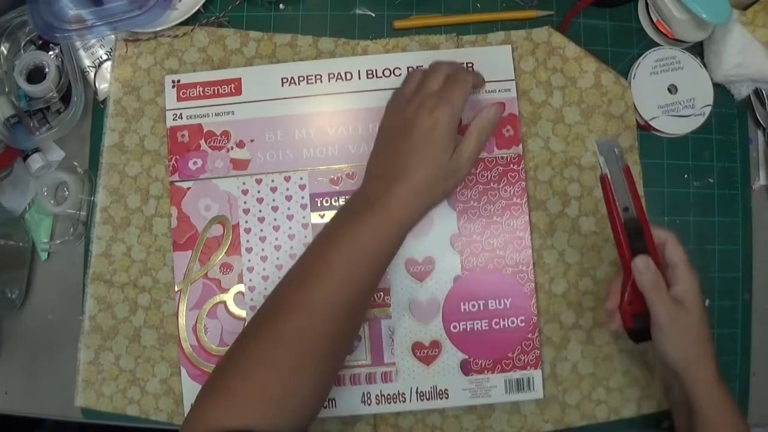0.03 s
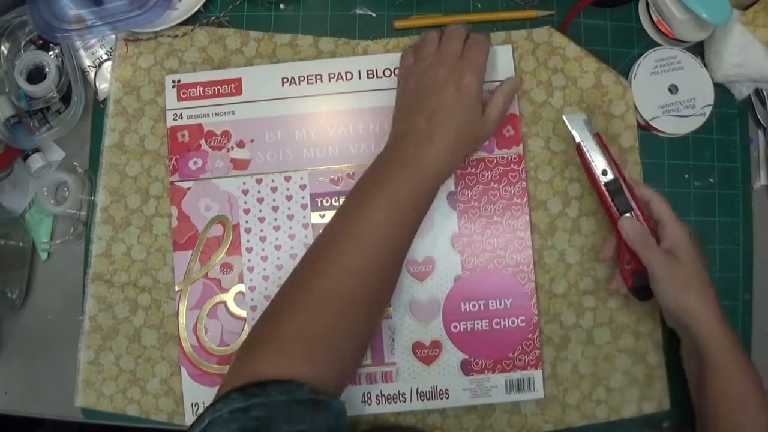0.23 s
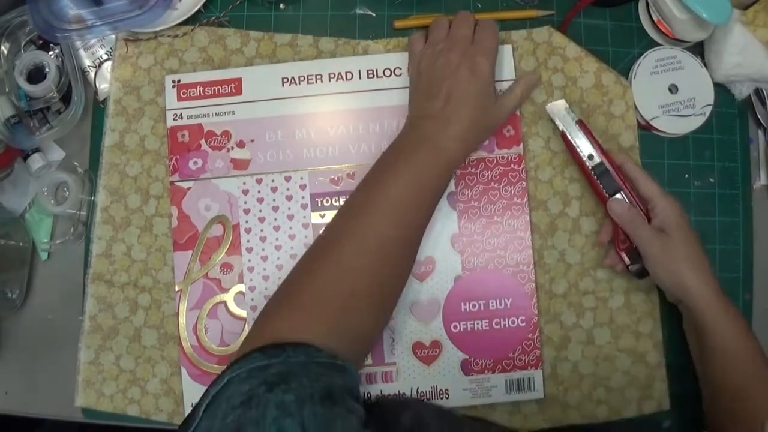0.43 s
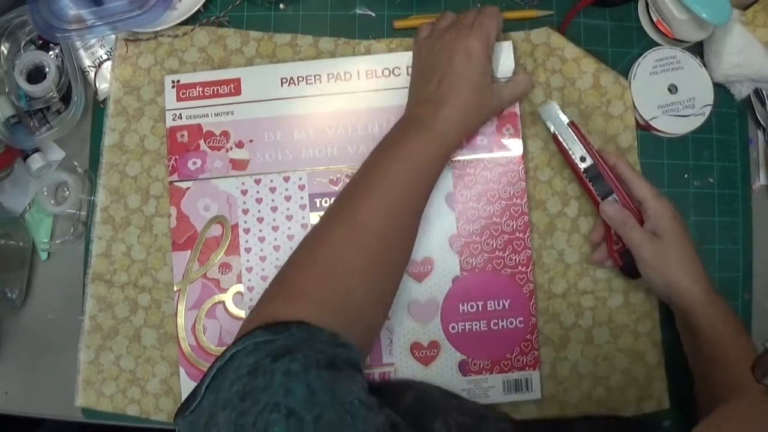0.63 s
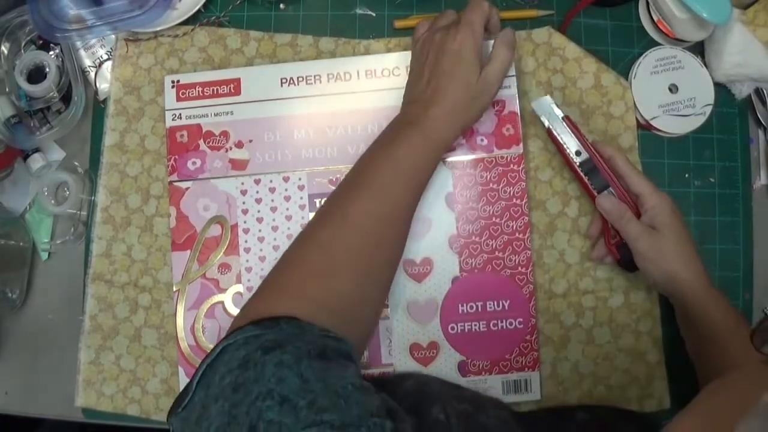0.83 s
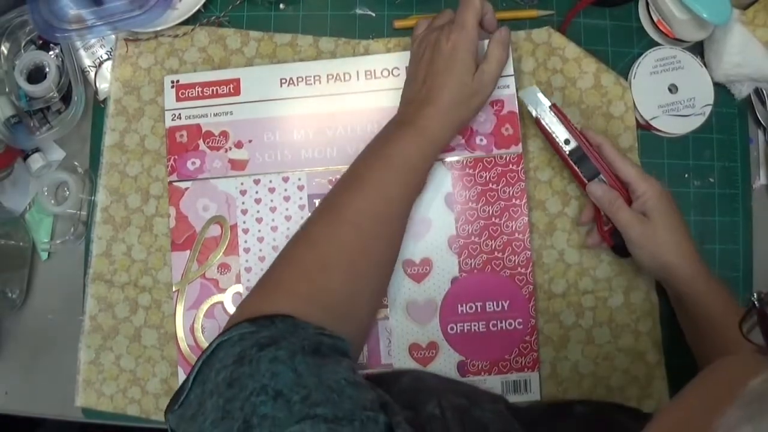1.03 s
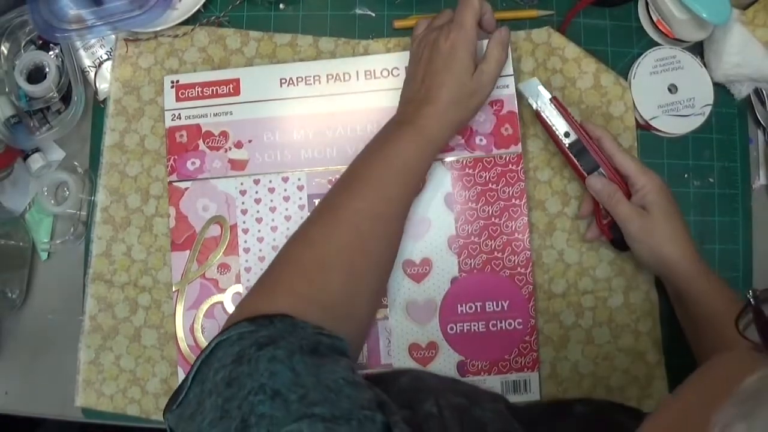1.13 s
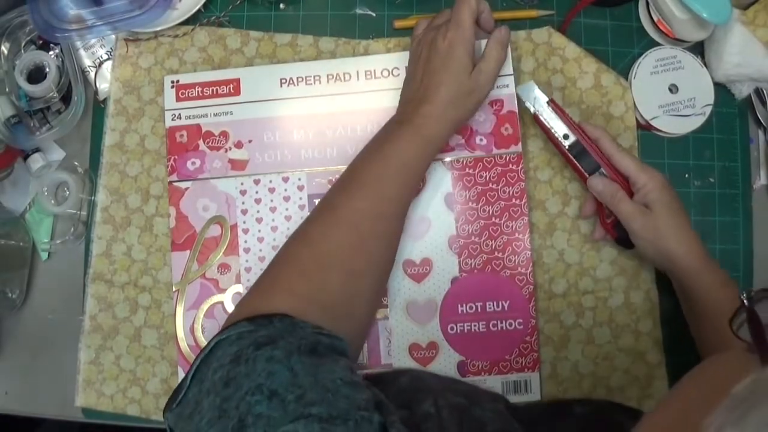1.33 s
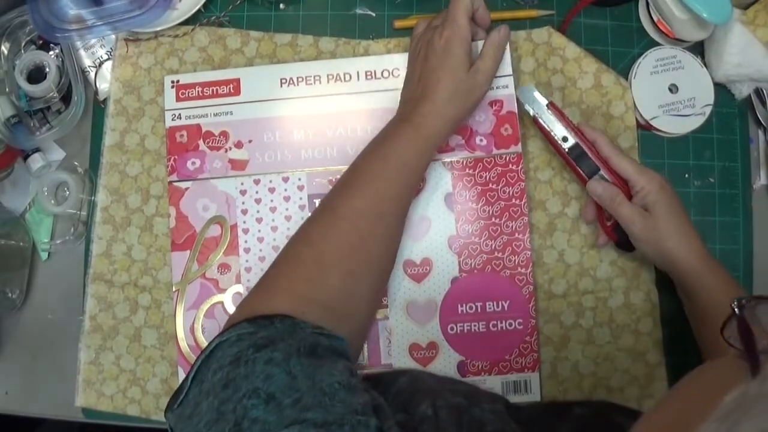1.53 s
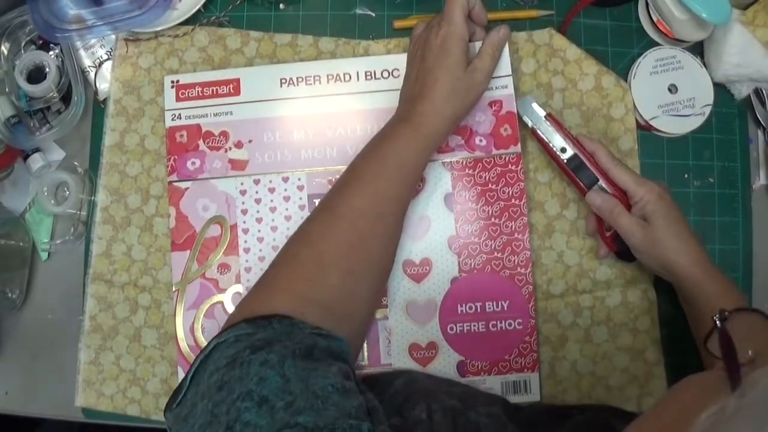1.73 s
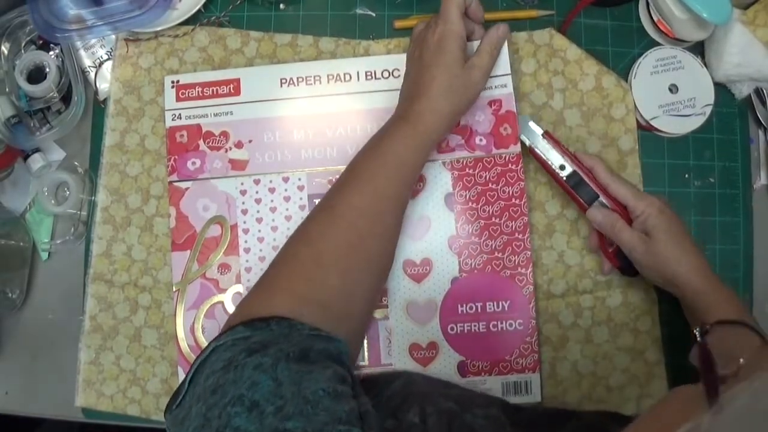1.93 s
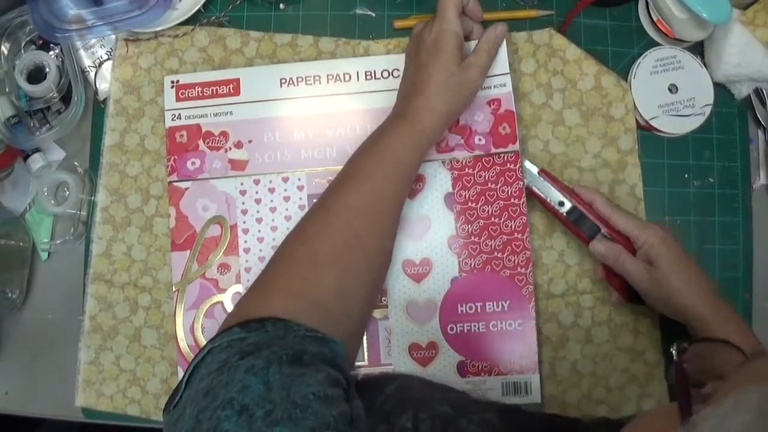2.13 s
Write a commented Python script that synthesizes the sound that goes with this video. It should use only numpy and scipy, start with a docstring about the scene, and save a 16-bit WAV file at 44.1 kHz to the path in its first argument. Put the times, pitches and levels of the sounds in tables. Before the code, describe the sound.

A knife blade ticks and snaps taut plastic wrap on a paper pad. Light clicks come at 0.1 seconds, a brief slide and dull hand thud with table boom around 0.35, then scattered ticks from 0.55 to 1.35. A sharp snap lands at 1.64, with harder crackling snaps and knocks at 1.9-2.1, ending in a short scrape. Close, small room, steady low rumble, faint hiss.

```python
"""Sharp snaps and tiny tears of taut plastic film, dull thuds on a table, faint sliding and a low steady rumble.
A snap-off utility knife slits the wrap of a thick paper pad on a craft table in a small room.
Snaps, knocks and thuds are short bursts of uneven noise with their own colour; film, pad and table ring.
Fingers and blade slide over the film as filtered grain noise, and the pressed blade makes it sing faintly.
A table reflection and room echoes carry the work to two microphones, over a rumble with a little hiss."""
import sys
import numpy as np
from scipy import signal
from scipy.fft import rfft, irfft, next_fast_len
from scipy.io import wavfile
from scipy.ndimage import uniform_filter1d

SR = 44100
rng = np.random.default_rng(int(sys.argv[2]) if len(sys.argv) > 2 else 0)


def pcm_store(signal):
    """Save signal as 16-bit PCM."""
    levels = np.round(np.clip(np.atleast_2d(signal), -1, 1) * 32767)
    wavfile.write(sys.argv[1], SR, levels.astype(np.int16).T)


N = 96270  # samples in the scene
CONTACT_SIZE = 8192  # samples in one contact

# Centre frequencies in Hz of the five colour bands of a snap.
SNAP_BANDS_HZ = [400, 650, 1400, 3600, 8000]
# The blade ticks on the film and tears it. Each row: start in seconds, length in seconds, level in dB in each
# of the five bands, then two rings of the taut film: low ring in Hz, its dB, high ring in Hz, its dB.
FILM_SNAPS = [ (0.0989, 0.0079, -33, -24, -3, 3.5, 2, 2055, 19.6, 3680, 4.3),
              (0.1654, 0.0014, 2.5, 0.5, -7.5, -10, -5.5, 560, 4.6, 7300, 2.8),
              (0.552, 0.0042, -18, -6.5, -23, -9.5, -11, 4200, 4.9, 6940, 3),
              (0.7308, 0.0051, -31, -3.5, -10.5, -15, -21, 950, 9.9, 1100, 9.5),
              (0.769, 0.0064, -9, -5, -4, -8, -7, 830, 4.3, 1120, 4.6),
              (0.7758, 0.013, 3.5, 6.5, 1, 2.5, 10, 2075, 9.4, 8300, 2.5),
              (1.0518, .005, -13, -14, -9, 9.5, 5, 1830, 15.8, 2336, 18.2),
              (1.1046, 0.012, -17, -16, -13.5, -1, 2.5, 1900, 18.4, 3125, 19),
              (1.2039, 0.0014, -15, -6, 0, 17, -22, 3090, 9.8, 3820, 14),
              (1.2045, 0.0034, 1, 2.5, 5.5, 9, 18, 3170, 7.7, 3790, 7),
              (1.341, 0.011, -31, -12, -10, -10, -13, 3000, 2, 3540, 13),
              (1.5210, 0.00075, -17, -31, -15, -18, -15, 4170, 5.9, 8200, 2.8),
              (1.6368, 0.0034, 2.5, 17, 20, 18.5, 16, 2733, 6.7, 7160, 4.8),
              (1.6420, 0.006, -7.5, 6, 7.5, 10, 6.5, 1140, 4, 2860, 3.4),
              (1.9039, 0.0029, 0.5, -8.5, -6, -7, -3.5, 1570, 3.5, 4730, 7.3),
              (1.936, 0.0059, -6, -5, -8, -4, -6, 1500, 2.7, 4500, 3),
              (1.946, 0.0066, 8, 11, 14.5, 10.5, 11, 1480, 8.1, 4530, 4.9),
              (1.9749, 0.003, -17, 19.5, 14.5, 11.5, 13.5, 1280, 2.4, 4430, 8.6),
              (2.055, 0.0018, -12, 0, -19, -13, -10, 4430, 2, 6800, 6.6),
              (2.0928, 0.0097, 14.5, 9, 10, 6.5, 3.5, 1660, 4.9, 3120, 2),
              (2.1020, 0.0034, 4, 24.5, 11, 13.5, 5.5, 1300, 15.6, 3080, 8.9),
              (2.112, .0006, -2, -8, 9, -11, 7, 9050, 9.2, 12800, 16),
              (2.116, 0.002, 16, 9, 0, 7, -4, 1260, 3.5, 1620, 3.8)]
# Time constants of a snap, and how unevenly its slips, and those of every other contact, are sized.
SNAP_ATTACK_S, SNAP_RELEASE_S, TEAR_SPREAD_DB = 0.00066, 0.0015, 2.5

# Resonances and hollows of knife and wrapped pad. Each row: centre in Hz, width in Hz, height in dB.
BODY_RESONANCES = [(609, 74, 5.5), (1230, 53, 3.5), (1606, 130, 4), (2187, 294, -3), (2784, 75, 7),
                   (3154, 40, 2), (3515, 220, 1), (3715, 180, 2), (4300, 125, 4), (4530, 130, 3),
                   (5114, 99, 4), (5640, 220, -6), (7030, 69, 2.5), (7740, 130, 3.5), (8530, 330, -1),
                   (9640, 640, -2)]
# Dulling of the top end. Each row: frequency in Hz, gain in dB.
TREBLE_LOSS = [(8000, -2), (10000, -7), (12000, -16.5), (15500, -28)]

# Hard knocks on the pad. Each row: start in seconds, level in dB, treble lift or cut in dB.
PAD_KNOCKS = [(1.9814, 4.5, -3), (1.9836, -9.5, 3), (2.1048, -2, -4.5)]
# Colour of a knock. Each row: frequency in Hz, level in dB.
KNOCK_COLOUR = [(90, -9), (170, -2), (300, 10.5), (420, 24), (640, 25.5), (900, 20), (1350, 22.5),
                (2000, 11.5), (3500, 18.5), (8000, 12)]
KNOCK_LENGTH_S, KNOCK_RELEASE_S = 0.0012, 0.0013
KNOCK_BRIGHT_HZ = 3000  # half of the treble lift or cut is reached here
# Ringing of the knocked pad. Each row: mode in Hz, level in dB, t60 in seconds.
PAD_MODES = [(427, -39, 0.097), (500, -38, 0.047), (578, -26.5, 0.11), (632, -31.5, 0.18),
             (750, -39.5, 0.088), (900, -40, 0.17), (1270, -29.5, 0.098), (1590, -34, .13)]

# The hand presses the pad down. Each row: start in seconds, level in dB.
HAND_THUDS = [(0.3549, 1), (.371, -28), (.386, -14.5), (0.402, -7.5), (0.413, -7.5), (.860, -19.5)]
# Colour of a thud. Each row: frequency in Hz, level in dB.
THUD_COLOUR = [(60, 3), (140, 13), (300, 6), (550, 15), (800, 7.5), (1400, -11), (2200, -2.5), (4000, -38),
               (8000, -48)]
THUD_LENGTH_S, THUD_RELEASE_S = 0.0031, 0.0044
# The table is set ringing. Each row: start in seconds, level in dB.
TABLE_BUMPS = [(0.357, -0.5), (.371, -3.5), (0.411, -12.5), (.860, -9.5), (1.64, -3.5), (1.985, -0.5),
               (2.103, -4)]
# Ringing of the table. Each row: mode in Hz, level in dB, t60 in seconds.
TABLE_MODES = [(142.3, -36, 0.36), (167.4, -30.5, 0.15), (207.3, -35.5, .2)]

# Sliding over the film. Each row: start in seconds, length in seconds, level in dB, tilt in dB per octave
# (reached well above 500 Hz).
FILM_SLIDES = [(-.02, 0.056, -44, 0), (0.29, 0.055, -42.5, -5), (0.368, .08, -53.5, -1.5),
               (0.536, 0.013, -45, 2), (0.565, 0.35, -58.5, -2), (1.827, 0.15, -56.5, 3),
               (2.112, .09, -36.5, 1)]
# Colour of the sliding. Each row: frequency in Hz, level in dB.
SLIDE_COLOUR = [(100, -14), (300, 3.5), (620, 2), (1200, -0.5), (2000, 3), (3000, 0.5), (5500, 1.5),
                (8000, 2.5)]
SLIDE_ATTACK_S, SLIDE_RELEASE_S, SLIDE_GRAIN_DB = 0.0086, 0.045, 1.4
# The film sings under the pressed blade. Each row: start in seconds, length in seconds, level in dB.
FILM_SQUEAKS = [(1.515, 0.16, -58), (1.75, 0.26, -61.5)]
SQUEAK_HZ, SQUEAK_WIDTH_HZ = 3000, 730

# One strong reflection off the table top combs every sound of the work.
REFLECTION_S, REFLECTION_DB = 0.00161, -15
# Echoes of table top and room. Each row: frequency in Hz, early level in dB, late level in dB,
# late t60 in seconds.
ROOM_ECHOES = [(149, -6.5, -18, 0.13), (600, -7.5, -11.5, 0.14), (1500, -9, -15.5, 0.2),
               (3550, -12.5, -17.5, 0.24), (7440, -15, -11.5, 0.18), (14000, -27, -34, 0.15)]
EARLY_T60_S, EARLY_DELAY_S, LATE_DELAY_S = 0.066, 0.003, 0.012

# Relative spectrum of the room tone. Each row: frequency in Hz, density in dB per Hz.
ROOM_TONE_COLOUR = [(20, -24), (30, -27), (39, -2.5), (50, -1.5), (75, 0), (105, -18), (160, -15.5),
                    (300, -18.5), (600, -24.5), (1200, -29), (2200, -30), (3000, -30.5), (4500, -33.5),
                    (8000, -33), (11000, -38), (15500, -43)]
ROOM_TONE_DB = -45.5  # level of its middle channel
# The two microphones. Each row: frequency in Hz, width of the work in dB, width of the room tone in dB,
# left minus right in dB.
MICROPHONES = [(50, -48, -46, -4), (180, -38, -15.5, -1), (610, -25, -1.5, 0.3), (1390, -22, 1, -1.1),
               (4570, -16.5, -6, -1.7), (7960, -18.5, -12, -1), (12900, -28, -47, -.4)]
CUTOFF_HZ = 16000


def snaps(ring_q=24.0, low_cut_hz=170):
    """Each tear has its own colour and sets two resonances of the stretched film ringing."""
    out, hz = np.zeros(N), bins(CONTACT_SIZE)
    low_cut_db = -10 * np.log10(1 + (low_cut_hz / (hz + 1)) ** 2)
    for start_s, length_s, *bands_db, low_hz, low_db, high_hz, high_db in FILM_SNAPS:
        colour_db = at_hz(list(zip(SNAP_BANDS_HZ, bands_db)), hz) + body_db(hz) + low_cut_db
        low_ring_db = bell_db(hz, low_hz, low_hz / ring_q, low_db)
        high_ring_db = bell_db(hz, high_hz, high_hz / ring_q, high_db)
        colour_db = colour_db + np.maximum(low_ring_db, high_ring_db)
        add(out, start_s, contact(length_s, SNAP_ATTACK_S, SNAP_RELEASE_S, colour_db))
    return out


def knocks(attack_s=0.00011):
    """The knife jumps free and hits the pad, which rings briefly."""
    out, hz = np.zeros(N), bins(CONTACT_SIZE)
    for start_s, level_db, treble_db in PAD_KNOCKS:
        treble_shelf_db = treble_db * hz / (hz + KNOCK_BRIGHT_HZ)
        colour_db = at_hz(KNOCK_COLOUR, hz) + body_db(hz) + treble_shelf_db
        hit = contact(KNOCK_LENGTH_S, attack_s, KNOCK_RELEASE_S, colour_db)
        add(out, start_s, from_db(level_db) * hit)
        add(out, start_s, from_db(level_db) * ring(PAD_MODES))
    return out


def thuds(attack_s=0.00031):
    """Soft pushes on the pad are dull noise bursts; the table booms under it in damped modes."""
    out, hz = np.zeros(N), bins(CONTACT_SIZE)
    for start_s, level_db in HAND_THUDS:
        colour_db = level_db + at_hz(THUD_COLOUR, hz) + at_hz(TREBLE_LOSS, hz)
        add(out, start_s, contact(THUD_LENGTH_S, attack_s, THUD_RELEASE_S, colour_db))
    for start_s, level_db in TABLE_BUMPS:
        add(out, start_s, from_db(level_db) * ring(TABLE_MODES))
    return out


def slides():
    """Fine friction grains under each stroke, coloured by film, knife and pad."""
    out, hz = np.zeros(N), bins(N)
    for start_s, length_s, level_db, tilt_db in FILM_SLIDES:
        colour_db = at_hz(SLIDE_COLOUR, hz) + body_db(hz) + tilt_db * np.log2(1 + hz / 500)
        rub = irfft(rfft(grains(N, SLIDE_GRAIN_DB)) * from_db(colour_db), N)
        out += from_db(level_db) * stroke(start_s, length_s) * rub / rub.std()
    return out


def squeaks():
    """Friction grains under the pressed blade ring one narrow resonance of the film."""
    resonance = peak(bins(N), SQUEAK_HZ, SQUEAK_WIDTH_HZ)
    sing = irfft(rfft(grains(N, SLIDE_GRAIN_DB)) * resonance, N)
    pressure = sum(from_db(level_db) * stroke(start_s, length_s) for start_s, length_s, level_db in FILM_SQUEAKS)
    return sing / sing.std() * pressure


def contact(length_s, attack_s, release_s, colour_db):
    """A short run of slips, evened across frequency, then given its colour."""
    t = np.arange(CONTACT_SIZE) / SR
    attack = 1 - np.exp(-t / attack_s)
    release = np.exp(-np.maximum(t - length_s, 0) / release_s)
    spectrum = rfft(grains(CONTACT_SIZE, TEAR_SPREAD_DB) * attack * release)
    power = uniform_filter1d(np.abs(spectrum) ** 2, size=36)
    evening_db = -10 * np.log10(power + 1e-12)
    return irfft(spectrum * causal(colour_db + evening_db))


def grains(size, spread_db):
    """Dense tiny slips of very uneven size."""
    unevenness = np.minimum(rng.exponential(1, size), 4)
    return rng.standard_normal(size) * from_db(spread_db * unevenness)


def ring(modes):
    """Damped sines of a struck object, every second one inverted."""
    t = np.arange(SR // 2) / SR
    out = np.zeros(len(t))
    for k, (hz, level_db, t60_s) in enumerate(modes):
        out += (-1) ** k * from_db(level_db - 60 * t / t60_s) * np.sin(2 * np.pi * hz * t)
    return out


def stroke(start_s, length_s):
    """A sliding stroke swells, holds and fades."""
    t = np.arange(N) / SR - start_s
    return np.clip(t / SLIDE_ATTACK_S, 0, 1) * np.exp(-np.maximum(t - length_s, 0) / SLIDE_RELEASE_S)


def body_db(hz):
    """Colour that knife and pad give to a contact."""
    return sum(bell_db(hz, *resonance) for resonance in BODY_RESONANCES) + at_hz(TREBLE_LOSS, hz)


def echoes():
    """Quick scatter from the cluttered table, then the room dying away band by band."""
    t, out = np.arange(SR // 2) / SR, 0
    edges, white = np.geomspace(80, 17000, 12), rng.standard_normal((2, SR // 2))
    for k, (low, high) in enumerate(zip(edges, edges[1:])):
        hz = np.sqrt(low * high)
        share = np.sqrt(2 * (high - low) / SR)  # of white noise that falls in this band
        band = signal.butter(2, [low, high], "band", fs=SR, output="sos")
        early = (EARLY_DELAY_S, EARLY_T60_S, at_hz(ROOM_ECHOES, hz, axis=1))
        late = (LATE_DELAY_S, at_hz(ROOM_ECHOES, hz, axis=3), at_hz(ROOM_ECHOES, hz, axis=2))
        for delay_s, t60_s, level_db in (early, late):
            white = white[:, ::-1]  # early and late parts use the noise in opposite directions
            decay = (t > delay_s) * from_db(-60 * t / t60_s)
            tail = signal.sosfilt(band, white[k % 2] * decay)
            out = out + from_db(level_db) * share * tail / np.linalg.norm(tail)
    return out


def room_tone():
    """Steady rumble and faint hiss from shaped noise, widest in the middle of the range."""
    hz = bins(N)
    spectra = rfft(rng.standard_normal((2, N))) * from_db(at_hz(ROOM_TONE_COLOUR, hz))
    mid = irfft(spectra[0], N)
    side = irfft(spectra[1] * from_db(at_hz(MICROPHONES, hz, axis=2)), N)
    return from_db(ROOM_TONE_DB) * np.array([mid + side, mid - side]) / mid.std()


def from_db(db):
    """Decibels to gain."""
    return 10 ** (np.asarray(db) / 20)


def at_hz(points, hz, axis=1):
    """Read one column of a table on a log-frequency axis."""
    points = np.array(points)
    return np.interp(np.log(hz + 1), np.log(points[:, 0]), points[:, axis])


def bins(size):
    """Frequencies of a spectrum of so many samples."""
    return np.arange(size // 2 + 1) * SR / size


def peak(hz, centre_hz, width_hz):
    """Bell of height 1."""
    return 1 / (1 + (2 * (hz - centre_hz) / width_hz) ** 2)


def bell_db(hz, centre_hz, width_hz, db):
    """A resonance (or, below 0 dB, a hollow) of this width and height."""
    return np.sign(db) * 10 * np.log10(1 + (from_db(abs(db)) ** 2 - 1) * peak(hz, centre_hz, width_hz))


def causal(db):
    """Minimum-phase response with these gains: nothing sounds early."""
    cepstrum = irfft(np.log(from_db(db)))
    half = len(cepstrum) // 2
    cepstrum[1:half] *= 2
    cepstrum[half + 1:] = 0
    return np.exp(rfft(cepstrum))


def add(out, start_s, sound):
    """Mix a sound in at its time."""
    i = int(np.clip(start_s * SR, 0, N - 1))
    out[i:i + len(sound)] += sound[:N - i]


def scene(bounce_s=0.00053, room_width_db=11):
    """The work lies a little to the right; a table bounce and the room reach the two microphones unequally."""
    work = snaps() + knocks() + thuds() + slides() + squeaks()
    size = next_fast_len(N + SR)  # leaves space for the echoes
    hz, direct = bins(size), rfft(work, size)
    reflection = from_db(REFLECTION_DB) * np.exp(-2j * np.pi * hz * REFLECTION_S)
    mid = direct * (1 + reflection + rfft(echoes(), size))
    bounce = np.exp(-2j * np.pi * hz * bounce_s)
    wide_room = from_db(room_width_db) * rfft(echoes(), size)
    side = direct * from_db(at_hz(MICROPHONES, hz)) * (bounce + wide_room)
    pan = from_db(at_hz(MICROPHONES, hz, axis=3) / 2)
    return irfft([(mid + side) * pan, (mid - side) / pan], size)[:, :N] + room_tone()


def record(dry):
    """The highest peaks are rounded and the top is cut."""
    rounded = 0.95 * np.tanh(dry / 0.95)
    low_pass = signal.ellip(10, 0.1, 70, CUTOFF_HZ, fs=SR, output="sos")
    return signal.sosfilt(low_pass, rounded)


dry = scene()
out = record(dry)
pcm_store(out)
```